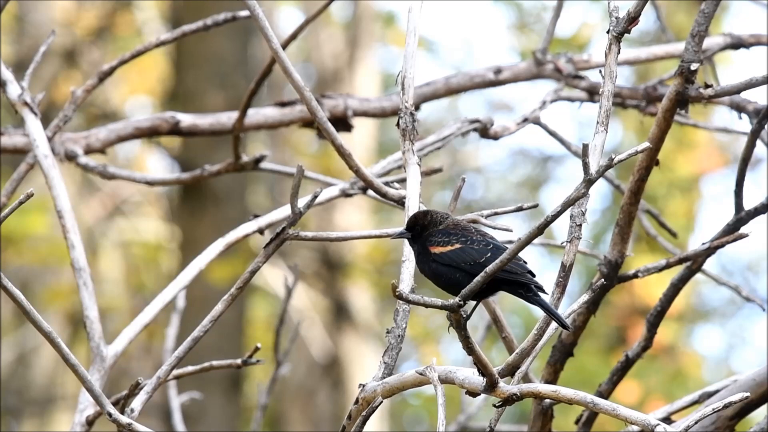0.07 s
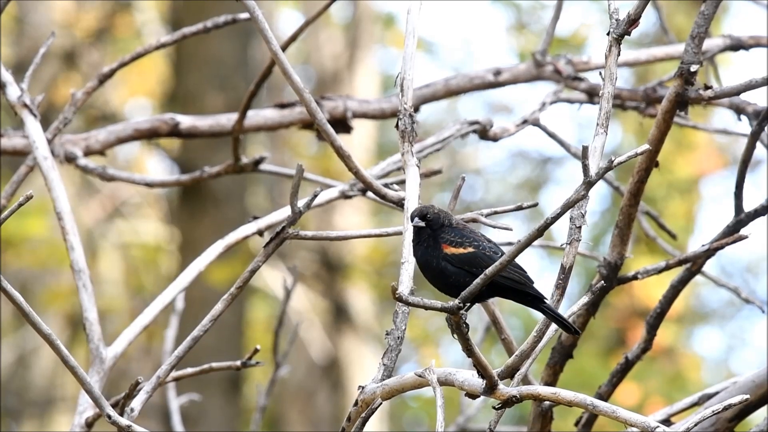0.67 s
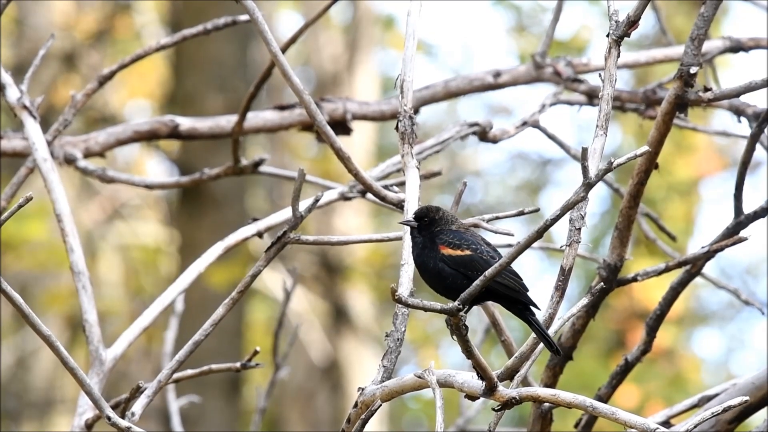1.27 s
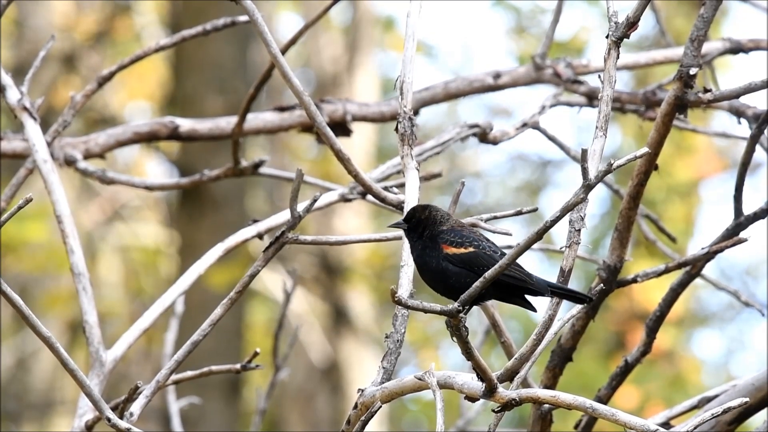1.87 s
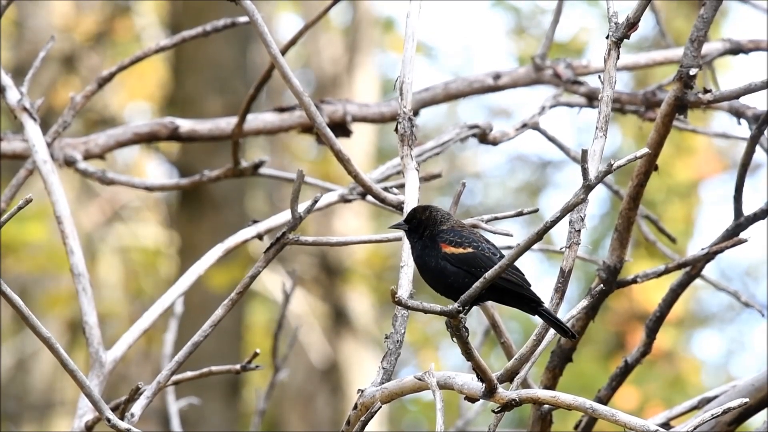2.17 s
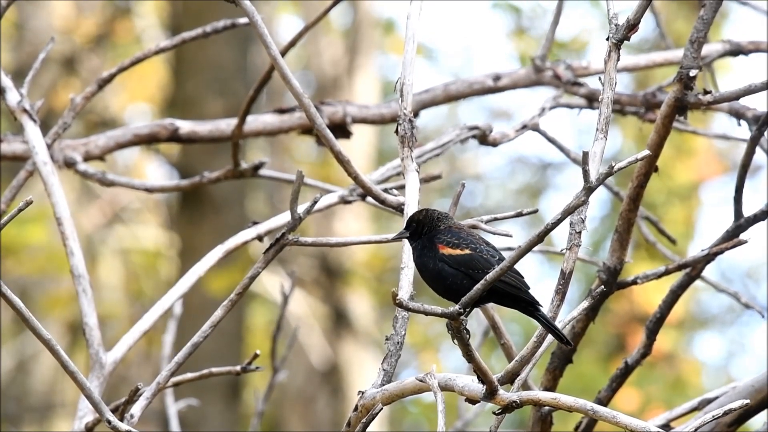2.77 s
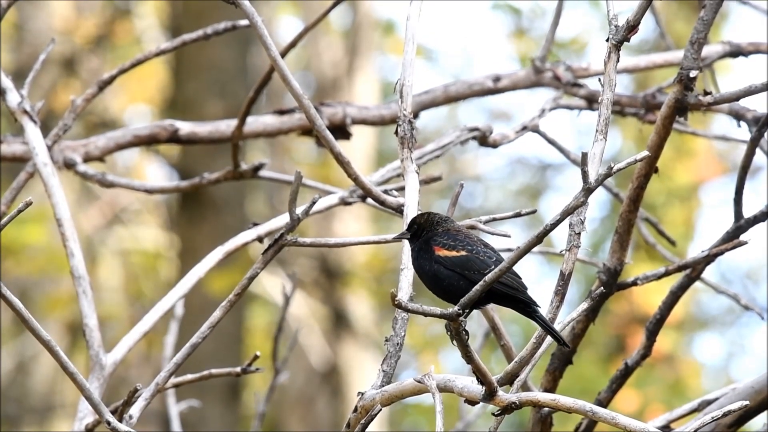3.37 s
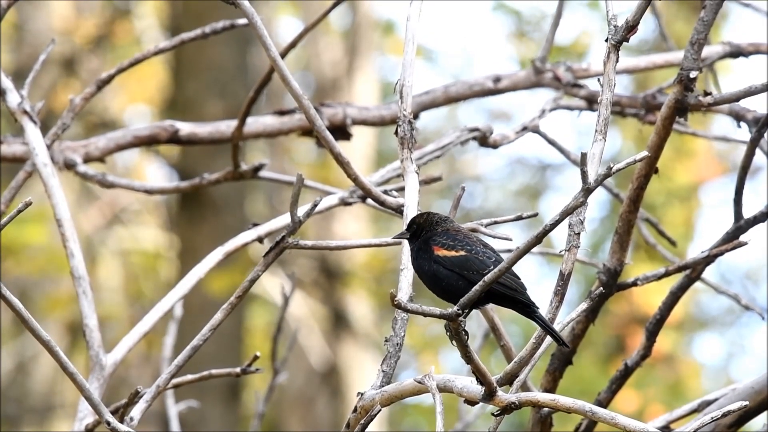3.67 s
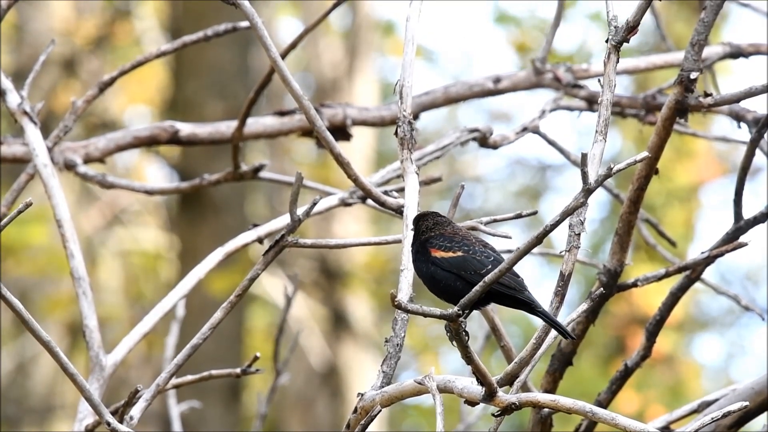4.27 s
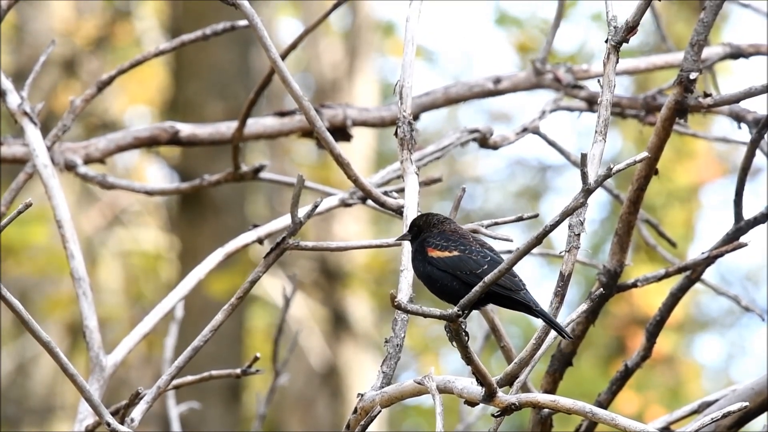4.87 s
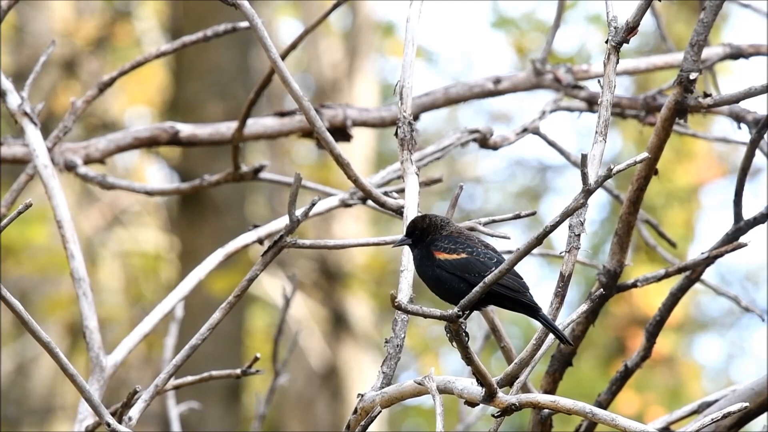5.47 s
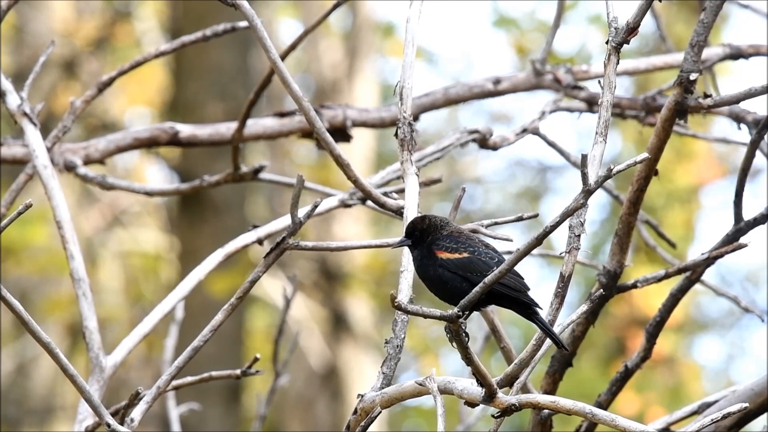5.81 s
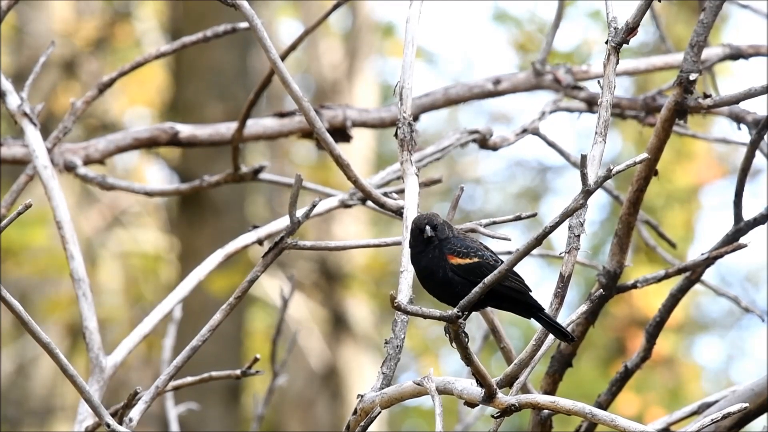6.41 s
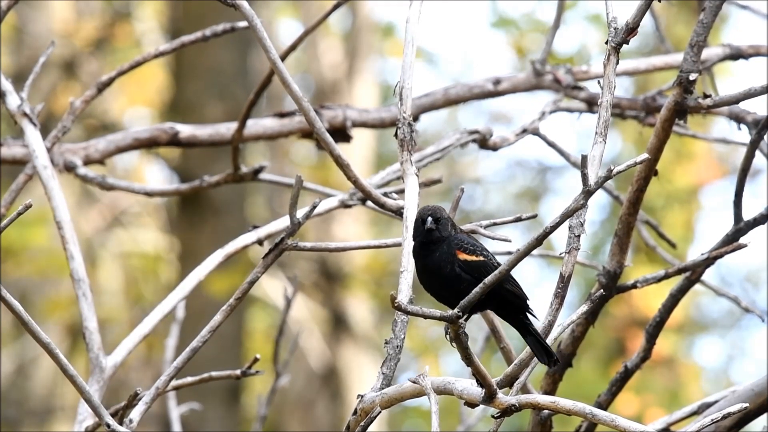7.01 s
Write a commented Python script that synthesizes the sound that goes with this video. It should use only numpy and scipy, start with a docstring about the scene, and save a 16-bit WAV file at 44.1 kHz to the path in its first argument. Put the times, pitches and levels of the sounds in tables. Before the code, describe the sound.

Quiet woodland is heard in stereo, with a steady distant rumble, soft hiss and a faint hum that swells until 1.5 seconds, then slowly fades. Dry leaves rustle and tick lightly on both sides, stirring most around 0.8 seconds. A close blackbird near the centre gives four very short, sharp, slightly raspy checks at 1.6, 4.9, 6 and 7 seconds, each echoing briefly among the trees. These stand well above everything else; the second is loudest and the third softest. Dry clucks come from the right, clearest at 1.3 and 3.5 seconds. A distant bird, also on the right, yelps faintly from 2.2 to 4.6 seconds and twice around 7. Small birds scatter thin, high lisps throughout, with far, hoarse whistles around 4 and 5.9 seconds. Faint, short, low bird toots sound just right of centre, mostly between 5.3 and 6.8 seconds.

```python
"""Four sharp 'check' calls from a blackbird on a branch near the microphones, each a fast whip of pitch
that the trees answer. Farther into the wood, small birds lisp and whistle; off to the right, two lower
voices yelp and toot, and dry clucks sound. Dry leaves stir and tick around the stereo pair, over a bed
of distant rumble and a faint hum that swells, then slowly fades."""
import sys
import numpy as np
from scipy import signal
from scipy.fft import rfft, irfft, next_fast_len
from scipy.io import wavfile
from scipy.ndimage import map_coordinates

SR = 44100
rng = np.random.default_rng(int(sys.argv[2]) if len(sys.argv) > 2 else 0)


def store_wav(level_fs):
    """Save 16-bit WAV to argv[1]."""
    pcm = np.round(np.clip(np.atleast_2d(level_fs), -1, 1) * 32767)
    wavfile.write(sys.argv[1], SR, pcm.T.astype(np.int16))


N = 319725


def amp(db):
    return 10 ** (np.asarray(db) / 20)


def unit(x):
    return x / np.sqrt(np.mean(x ** 2) + 1e-20)


def along(points, hz):
    """Read (f/Hz, value) points at hz, on a log frequency axis."""
    freqs, values = np.transpose(points)
    return np.interp(np.log(hz + 1), np.log(freqs + 1), values)


def wobble(rate, size):
    """A smooth random curve with rate knots a second."""
    knots = rng.standard_normal(int(size * rate / SR) + 4)
    return map_coordinates(knots, [np.arange(size) * rate / SR])


def filtered(x, response):
    """x through a filter whose gain is response(hz)."""
    size = x.shape[-1]
    padded = next_fast_len(size + 4096)
    return irfft(rfft(x, padded) * response(np.fft.rfftfreq(padded, 1 / SR)), padded)[..., :size]


def coloured(x, spectrum):
    """x shaped by (f/Hz, level/dB) points, at rms 1."""
    return unit(filtered(x, lambda hz: amp(along(spectrum, hz))))


def add(track, s, sound, pan_db=0):
    """Mix a sound into a stereo track at time s; pan_db is left minus right."""
    part = track[:, max(round(s * SR), 0):][:, :sound.shape[-1]]
    part += (amp([[pan_db / 2], [-pan_db / 2]]) * sound)[:, :part.shape[1]]


def progress(length):
    """0 to 1 over a note of length seconds."""
    return np.linspace(0, 1, int(length * SR))


def tone(hz, taper):
    """A sine on a pitch track, with soft ends."""
    return np.sqrt(2) * np.sin(2 * np.pi * np.cumsum(hz) / SR) * signal.windows.tukey(len(hz), taper)


def woods(sound, wet_db, t60, near_db, near_t60, lag_ms):
    """A sound at the pair, lag_ms later on the left: near branches scatter it, far trunks add a tail."""
    t = np.arange(SR) / SR
    trunks = rng.standard_normal((2, SR)) * amp(-60 * t / t60) * (1 - np.exp(-t / 0.01))
    branches = rng.standard_normal((2, SR)) * amp(-60 * t / near_t60) * (1 - np.exp(-t / 0.006))
    echo = (amp(wet_db) * unit(trunks) + amp(near_db) * unit(branches)) / np.sqrt(SR)
    delay_s = np.array([[.5], [-.5]]) * lag_ms / 1000
    direct = filtered(np.pad(sound, (0, SR - 1)), lambda hz: np.exp(-2j * np.pi * hz * delay_s))
    return direct + signal.fftconvolve(sound[None], echo, axes=1)


def air():
    """The bed: far rumble, alike at both microphones, and a soft, wide hiss."""
    # spectrum of the bed: f/Hz, level/dB
    spectrum = [(12, -55), (20, -22.5), (59, -6), (101, -3.5), (122, -7), (148, -6.5), (180, -10.5),
                (289, -13), (416, -15.5), (452, -13.5), (746, -15), (2840, -19.5), (7520, -23.5),
                (15500, -28.5)]
    # likeness of left and right: f/Hz, correlation
    likeness = [(60, 0.94), (150, 0.6), (380, 0.46), (950, -0.0005), (2380, -0.11), (5980, 0.059),
                (15000, -0.13)]

    def mid_side_gains(hz):
        angle = np.arccos(along(likeness, hz)) / 2
        return amp(along(spectrum, hz)) * np.array([np.cos(angle), np.sin(angle)])

    mid, side = filtered(rng.standard_normal((2, N)), mid_side_gains)
    return unit(np.array([mid + side, mid - side])) * amp(-56 + 0.095 * wobble(3.7, N))


def hum():
    """A faint, wavering hum in the centre that swells, then slowly fades."""
    # partials before the swell: f/Hz, level/dB
    partials = [(100.2, -74), (150.6, -69), (452, -87)]
    peak_s, peak_db, rise_db_per_s, fall_db_per_s = 1.5, 5.3, 2.6, 1.6
    out, t = np.zeros(N), np.arange(N) / SR
    for hz, db in partials:
        level = np.sqrt(2) * amp(db + 1.6 * wobble(5.3, N))
        out += level * np.sin(2 * np.pi * hz * t + 0.58 * wobble(5, N))
    return out * amp(peak_db - np.maximum(rise_db_per_s * (peak_s - t), fall_db_per_s * (t - peak_s)))


def leaf_rustle():
    """Dry leaves on both sides: a crackle that swells and settles with each stir."""
    # crests of the stirs: t/s, level/dB
    stirs = [(0.55, -60.5), (0.8, -52), (1.45, -58.5), (2.45, -57.5), (2.93, -58), (4.1, -60.5),
             (4.68, -67), (5.8, -62.5), (6.27, -57.5), (6.85, -64)]
    # spectrum of the rustle: f/Hz, level/dB
    spectrum = [(600, -18), (2000, -1), (4000, -3.5), (6500, 1), (8500, -3), (11000, -8.5), (15500, -16)]
    rise_s, fall_s, calm_db = 0.2, 0.19, -73.5
    t = np.arange(N) / SR
    swells = [amp(db) * np.exp(-np.maximum((s - t) / rise_s, (t - s) / fall_s)) for s, db in stirs]
    level = np.hypot(amp(calm_db), np.linalg.norm(swells, axis=0))  # the powers add
    crackle = rng.standard_normal((2, N)) * amp(2.2 * wobble(350, N) + 2.5 * wobble(35, N))
    return level * coloured(crackle, spectrum)


def leaf_ticks():
    """Dry leaves tick in fast-dying snaps of noise: some clear, and faint ones at random times."""
    # the clear ticks: t/s, level/dB, tilt below the pivot/(dB per octave)
    clear = [(0.2588, -45, 6), (0.717, -38, 4), (0.7546, -38.5, -1), (1.4307, -46, 10), (2.008, -39, -3),
             (2.391, -37.5, 22), (2.7793, -39, 9), (4.1406, -39, -2), (4.225, -41.5, 1),
             (4.6053, -39, -5.5), (4.7494, -40.5, 13), (5.028, -42, 6), (5.8512, -37, 5), (6.243, -45, -3)]
    # spectrum of a tick before its tilt: f/Hz, level/dB
    spectrum = [(500, -30), (1500, 0.5), (3300, 0.5), (4800, 10), (6500, -6.5), (8300, 6.5), (10000, -7),
                (15000, -22)]
    pivot_hz, faint_per_s, faint_db = 6500, 2, -48.5
    out, end_s = np.zeros((2, N)), (N - 1) / SR
    age = np.arange(2048) / SR
    fade = amp(-60 * age / .028)
    faint = [(rng.uniform(0, end_s), rng.normal(faint_db, 1), 0) for _ in range(int(faint_per_s * end_s))]
    for s, db, tilt_db in clear + faint:
        tilted = [(hz, level + tilt_db * np.log2(min(hz / pivot_hz, 1))) for hz, level in spectrum]
        snap = amp(db - 4.5) * coloured(rng.standard_normal(len(age)), tilted) * fade
        add(out, s, woods(snap, wet_db=-13, t60=.2, near_db=-5, near_t60=.045, lag_ms=-.1))
    return out


def yelps():
    """A distant bird on the right: arched yelps, a little hoarse and never quite alike."""
    # the yelps: t/s, top f/Hz, level/dB
    calls = [(2.18, 1660, -60), (2.444, 1790, -54.5), (2.673, 1735, -56), (2.939, 1723, -56.5),
             (3.213, 1672, -58), (4.003, 1673, -56.5), (4.303, 1678, -58), (4.61, 1740, -56.5),
             (6.884, 1675, -55), (7.119, 1687, -55.5)]
    # arch of one yelp: share of its length, f/top f, level/dB
    arch = [(0, 0.764, -8), (.25, .92, 0), (.45, 1, 4.5), (.68, .92, 0), (1, 0.67, -4)]
    share, bend, level_db = np.transpose(arch)
    out, u = np.zeros((2, N)), progress(0.0461)
    for s, top_hz, db in calls:
        hz = top_hz * np.interp(u, share, bend) * (1 + .025 * wobble(350, len(u)))
        note = amp(db + np.interp(u, share, level_db)) * tone(hz, taper=0.45)
        add(out, s, woods(note, wet_db=-4, t60=1, near_db=-11, near_t60=0.069, lag_ms=0.16), pan_db=-7.5)
    return out


def toots():
    """A low voice just right of centre: short toots that fall in pitch."""
    # the toots: t/s, f/Hz, level/dB
    calls = [(2.682, 813, -58), (5.269, 810, -52.5), (5.36, 804, -60.5), (6.313, 738, -51.5),
             (6.38, 750, -58), (6.583, 754, -52), (6.719, 745, -50), (6.805, 755, -55.5)]
    out, u = np.zeros((2, N)), progress(0.019)
    for s, centre_hz, db in calls:
        hz = centre_hz * (1 + 0.11 * (.5 - u) + 0.028 * wobble(193, len(u)))
        note = amp(db) * tone(hz, taper=0.44)
        add(out, s, woods(note, wet_db=-8, t60=.28, near_db=-15, near_t60=.14, lag_ms=-.042), pan_db=-2)
    return out


def whistles():
    """Far, hoarse whistles that rise at once and then hold, more echo than direct sound."""
    # the whistles: t/s, length/s, start f/Hz, end f/Hz, level/dB, hoarseness/dB
    calls = [(3.965, 0.13, 3750, 4006, -51, -3.5), (3.99, 0.11, 6270, 6530, -60.5, -3),
             (5.913, 0.12, 3900, 4083, -52, 0), (5.921, 0.057, 5300, 6300, -61.5, 4.5),
             (0.315, 0.127, 1800, 2040, -64, -7), (0.316, 0.07, 1480, 1593, -61, 0.5),
             (2.947, 0.123, 1800, 1994, -67, 5)]
    # spectrum of the hoarse noise: f/end f, level/dB
    hoarse = [(.3, -22), (.65, -9), (1, 1), (1.12, -10), (1.5, -9.5), (2.2, -32)]
    out = np.zeros((2, N))
    for s, length, start_hz, end_hz, db, hoarse_db in calls:
        u = progress(length)
        glide_hz = end_hz + (start_hz - end_hz) * np.exp(-4 * u)
        hz = glide_hz * (1 + 0.015 * wobble(715, len(u)))
        breath = coloured(rng.standard_normal(len(u)), [(k * end_hz, level) for k, level in hoarse])
        note = amp(db - 4) * (tone(hz, taper=0.48) + amp(hoarse_db) * breath * np.sin(np.pi * u))
        add(out, s, woods(note, wet_db=4.5, t60=0.9, near_db=-1, near_t60=0.19, lag_ms=-0.497))
    return out


def lisp(length, start_hz, db, rise=.08):
    """One fluttering note with its echoes, curving upward by the share rise of its pitch."""
    u = progress(length)
    flutter = .017 * wobble(900, len(u))
    hz = start_hz * (1 + rise * u ** 1.3) * (1 + flutter)
    note = amp(db) * tone(hz, taper=0.48)
    return woods(note, wet_db=-1, t60=0.56, near_db=-4.5, near_t60=0.087, lag_ms=-0.252)


def lisps():
    """Small birds back in the trees: thin lisps, and longer two-voiced ones that end in an upward flick."""
    # short lisps: t/s, start f/Hz, level/dB
    singles = [(0.88, 6560, -52.5), (1.188, 6800, -65), (1.29, 7200, -64), (1.937, 6990, -57),
               (2.012, 7500, -57.5), (2.165, 6680, -62.5), (2.962, 6830, -55), (3.175, 7170, -62),
               (3.312, 6930, -64), (4.493, 6700, -62), (5.222, 6780, -62), (5.98, 6750, -61),
               (6.54, 6770, -61)]
    # two-voiced lisps: t/s, upper start f/Hz, level/dB, length/s, flick top f/Hz, flick gain/dB
    doubles = [(2.388, 7900, -51, .088, 9180, 7), (5.756, 7770, -61.5, .07, 8600, 3)]
    short_s, flick_s = .04, .037
    out = np.zeros((2, N))
    for s, hz, db in singles:
        add(out, s, lisp(short_s, hz, db))
    for s, hz, db, length, top_hz, flick_db in doubles:
        add(out, s, lisp(length, hz, db))
        add(out, s, lisp(length, .9 * hz, db - 4.5))  # the lower voice
        flick_hz = .94 * hz
        add(out, s + .85 * length, lisp(flick_s, flick_hz, db + flick_db, rise=top_hz / flick_hz - 1))
    return out


def clucks():
    """Toneless clucks on the right: puffs through a fixed low resonance and an upper one that varies."""
    # the clucks: t/s, level/dB, upper resonance f/Hz, low resonance level/dB
    calls = [(0.666, -46.5, 1850, -5.5), (1.2569, -36.5, 2060, -10), (2.023, -46, 2100, -26),
             (2.828, -50.5, 2230, -22), (3.454, -40, 1760, -3), (5.025, -44, 2540, 4),
             (5.85, -48, 3030, -25)]
    out = np.zeros((2, N))
    age = np.arange(2048) / SR / 0.0025  # 1 at the crest of the puff
    swell = (age * np.exp(1 - age)) ** 1.1
    for s, db, upper_hz, low_db in calls:
        throat = [(400, -24), (950, low_db), (1300, low_db / 2 - 7),
                  (upper_hz, 0), (1.11 * upper_hz, -2), (1.47 * upper_hz, -13), (12000, -33)]
        breath = coloured(rng.standard_normal(len(age)), throat)
        puff = amp(db) * unit(breath * swell) / unit(swell).max()
        add(out, s, woods(puff, wet_db=-14, t60=.4, near_db=-10, near_t60=.05, lag_ms=.13), pan_db=-6.5)
    return out


def blackbird():
    """Close by, each check whips in pitch: up to a pure crest, down, up to a rasping crest, and down."""
    # the checks: t/s, level/dB, crest f/Hz, dip f/Hz, second crest f/Hz, length/s, rasp/dB, pan/dB
    checks = [(1.6, -24, 3054, 2346, 3780, .0162, -8.5, -1), (4.8572, -18, 3260, 2546, 3270, .015, -13, -1),
              (5.988, -31.5, 2760, 2187, 2760, .012, -18, -3),
              (6.987, -22.5, 3285, 2278, 3300, 0.017, -13, -2.5)]
    # turns of one check: share of its length, level/dB, roughness (0-1)
    turns = [(0, -24, .6), (.16, -14, .5), (.3, -1, .2), (.44, 1, .25), (.55, 0, .4), (.67, -2, .7),
             (.77, -1, 1), (.89, -2, .7), (1, -11, .8)]
    # spectrum of the rasp: f/Hz, level/dB
    rasp_spectrum = [(500, -40), (1400, -4.5), (3500, 8), (5200, -4), (8300, -4), (10000, -58),
                     (11500, -7.5), (13000, -27), (15000, -30)]
    harmonics_db = [-5.5, -32, -31, -35]
    share, turn_db, turn_rough = np.transpose(turns)
    out = np.zeros((2, N))
    for s, db, crest_hz, dip_hz, second_hz, length, rasp_db, pan_db in checks:
        u = progress(length)
        turn_hz = [0.358 * crest_hz, .67 * crest_hz, crest_hz, (crest_hz + dip_hz) / 2,
                   dip_hz, dip_hz, second_hz, 1.046 * dip_hz, 0.7 * dip_hz]
        hz, level_db, rough = [np.interp(u, share, column) for column in (turn_hz, turn_db, turn_rough)]
        hz *= 1 + 0.058 * rough * wobble(886, len(u))
        voice = sum(amp(level) * tone(k * hz, taper=0.025) for k, level in enumerate(harmonics_db, 1))
        voice *= amp(2 * rough * wobble(1224, len(u)))
        rasp = coloured(rng.standard_normal(len(u)), rasp_spectrum)
        call = amp(db + level_db) * (voice + amp(rasp_db) * rough * rasp)
        add(out, s, woods(call, wet_db=-13.5, t60=.65, near_db=-6.5, near_t60=.05, lag_ms=.01), pan_db)
    return out


def scene():
    """The wood as it reaches the stereo pair."""
    birds = blackbird() + lisps() + whistles() + yelps() + toots() + clucks()
    return birds + leaf_rustle() + leaf_ticks() + air() + hum()


def record(dry):
    """A quick fade-in, and a sharp cut of the highest treble."""
    top_hz = 15850
    fade_in = np.interp(np.arange(N) / SR, [.045, .075], [0, 1]) ** 2
    return filtered(dry * fade_in, lambda hz: hz < top_hz)


dry = scene()
out = record(dry)
store_wav(out)
```